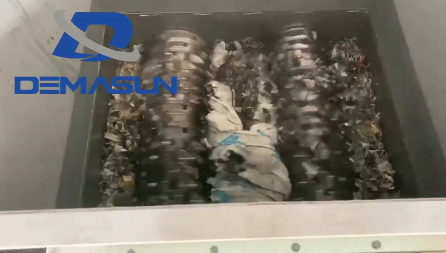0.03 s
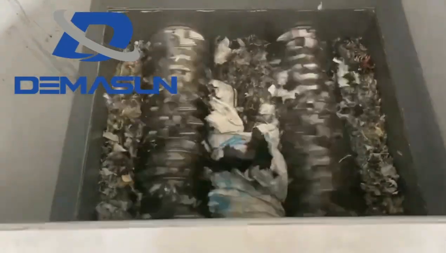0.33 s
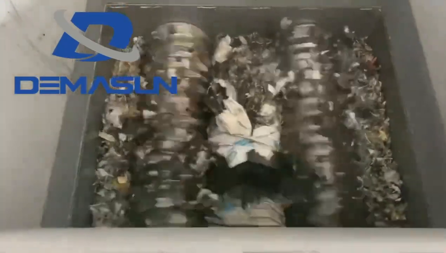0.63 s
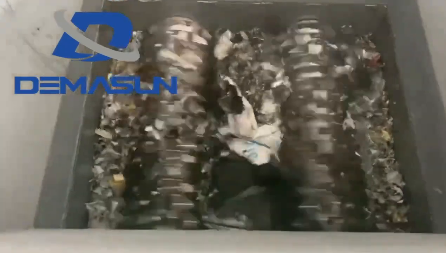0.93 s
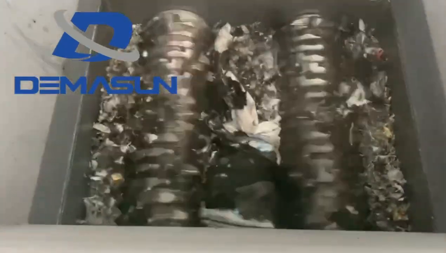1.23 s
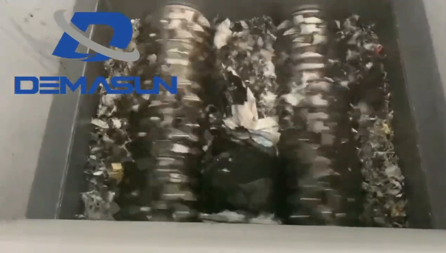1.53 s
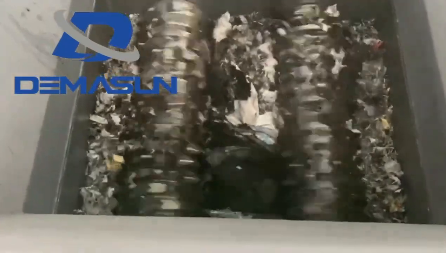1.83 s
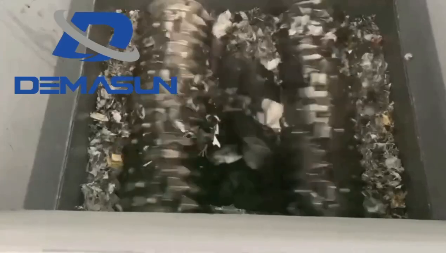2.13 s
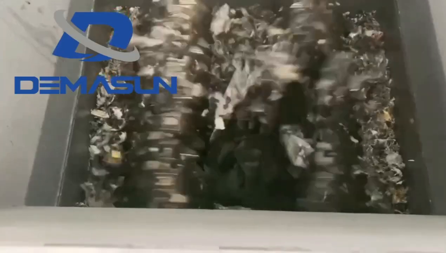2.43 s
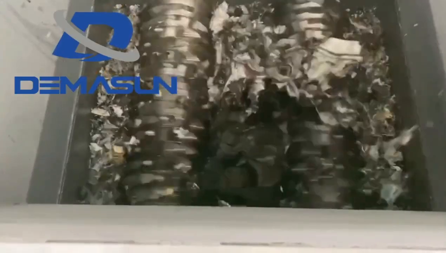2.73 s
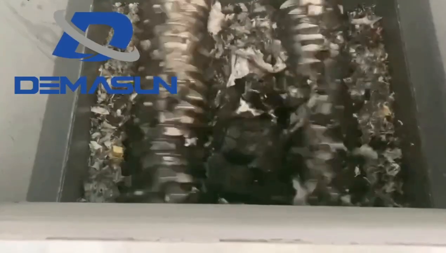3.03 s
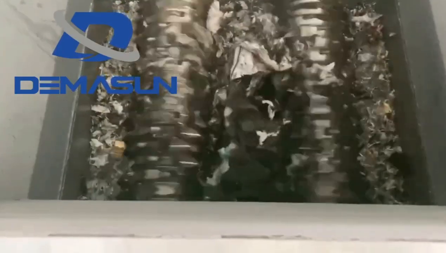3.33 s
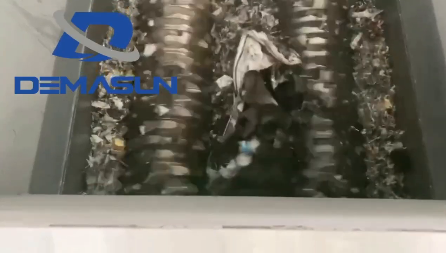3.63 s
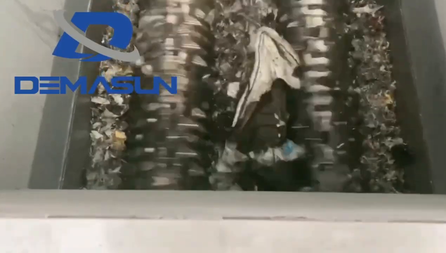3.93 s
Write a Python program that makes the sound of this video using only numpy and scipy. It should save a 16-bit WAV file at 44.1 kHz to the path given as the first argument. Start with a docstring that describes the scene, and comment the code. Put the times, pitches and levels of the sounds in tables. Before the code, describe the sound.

A shredder tears up plastic sheeting with rapid crunching, crackling bites and a low drone.

```python
"""A twin-shaft shredder tears up plastic sheeting, heard from just above its steel hopper.
The knives bite about five times a second. Each bite is a surge of tiny cracks that crunch, rip and
crackle, echoing between the hopper walls. Now and then a brittle piece snaps, or a lump knocks or
makes the housing groan. Underneath, scraps rustle, the frame rumbles, and motor and gears drone."""
import sys
import numpy as np
from scipy import signal
from scipy.fft import rfft, irfft
from scipy.io import wavfile

SR = 44100
rng = np.random.default_rng(int(sys.argv[2]) if len(sys.argv) > 2 else 0)


def store_pcm(level_fs):
    """Save levels as 16-bit WAV."""
    pcm = np.round(np.clip(level_fs, -1, 1) * 32767).astype(np.int16)
    wavfile.write(sys.argv[1], SR, np.atleast_2d(pcm).T)


N = 176400
T = np.arange(N) / SR

# Levels in the tables are relative: the functions may turn a layer up or down.
# hum of the motor (time [s], level [dB])
MOTOR_LEVELS = [(0, -31), (.46, -30), (.6, -37), (.7, -32.5), (1.35, -37), (1.65, -37), (1.78, -29.5),
                (2.05, -27), (2.6, -36), (3.5, -32), (3.65, -23.5), (3.8, -33.5), (4, -20.5)]
# drone of the gear teeth (time [s], level [dB])
GEAR_LEVELS = [(0, -39), (.4, -29.5), (1.5, -30), (1.9, -47), (2.4, -31.5), (2.8, -32), (4, -34)]
# rumble of the frame (time [s], level [dB])
RUMBLE_LEVELS = [(0, -24), (.5, -27), (.8, -26), (1.7, -26), (2.1, -26), (2.45, -25.5), (3.0, -25),
                 (4, -26)]
# notes at which frame and hopper ring (pitch [Hz], width [Hz], level [dB])
FRAME_RESONANCES = [(79.5, 9.8, -3), (103.2, 8.7, -9.5), (146, 12, -6.5), (170.6, 4.6, -1.5), (195, 12, 1),
                    (215, 10, -3.5), (252.4, 17.6, -6), (285.8, 16, -2.5), (348.5, 16.4, -1.5),
                    (384.6, 28, -7.5), (428.6, 10.8, -6.5), (473.8, 26, -9.5)]
# clatter of loose scraps (time [s], level [dB])
CLATTER_LEVELS = [(0, -35), (.75, -33), (1.1, -30), (1.9, -32), (2.65, -33.5), (3.0, -30), (3.3, -32),
                  (3.6, -30), (4, -33.5)]
# crinkle of thin film (time [s], level [dB])
CRINKLE_LEVELS = [(0, -39), (.3, -48.5), (.7, -43.5), (1.1, -40), (1.8, -37), (2.2, -40.5), (2.5, -46.5),
                  (3.1, -45.5), (4, -47.5)]
# groans of the housing (middle time [s], length [s], pitch [Hz], level [dB])
HOUSING_GROANS = [(0.263, 0.022, 340, -21), (0.525, 0.042, 229, -23), (0.57, 0.06, 340, -24),
                  (0.63, 0.083, 280, -27), (1.17, 0.035, 189.7, -25), (1.823, 0.047, 235, -21),
                  (2.04, 0.15, 176, -23.5), (2.2, 0.03, 186.3, -21.5), (2.259, 0.071, 278, -22.5),
                  (2.814, 0.045, 224.5, -24.5), (2.874, 0.059, 245, -26.5), (2.964, 0.056, 201.4, -20),
                  (3.087, 0.051, 215, -23.5), (3.429, 0.087, 248.5, -22.5), (3.588, 0.094, 207.6, -23.5)]
# lumps hitting the cutting chamber (time [s], level [dB], pitch [Hz])
LUMP_KNOCKS = [(0.918, -16, 836), (1.092, -19.5, 870), (1.423, -20, 746), (1.817, -15, 736),
               (1.836, -14, 830), (1.88, -14, 710), (2.068, -16, 775), (2.353, -21, 1240),
               (2.541, -17, 850), (2.864, -19, 790), (2.957, -15.5, 920), (3.053, -16.5, 690),
               (3.334, -20, 830), (3.503, -13, 925)]
# brittle pieces breaking (time [s], level [dB])
BRITTLE_SNAPS = [(0.218, -20.5), (0.918, -20.5), (1.208, -18.5), (1.226, -15), (1.302, -20), (1.422, -19),
                 (1.4706, -23), (1.774, -20.5), (1.834, -22), (1.8785, -17), (1.964, -18.5),
                 (1.9994, -13.5), (2.0618, -14), (2.074, -17), (2.1987, -21), (2.977, -17.5), (3.16, -32),
                 (3.437, -19.5), (3.636, -22)]
# bites of the knives (start [s], length [s], crunch [dB], rip [dB], crackle [dB])
KNIFE_BITES = [(0.018, 0.12, -29.5, -35, -44), (0.197, 0.18, -34.5, -36.5, -36),
               (0.38, 0.17, -32, -37.5, -39), (0.567, 0.15, -35.5, -36, -39),
               (0.783, 0.13, -29.5, -32.5, -35.5), (0.989, 0.13, -31, -33, -35.5),
               (1.166, 0.16, -35.5, -31.5, -34), (1.34, 0.19, -43, -33.5, -34.5),
               (1.552, 0.16, -28.5, -33, -31.5), (1.764, 0.15, -26.5, -31.5, -31.5),
               (1.975, 0.11, -27, -30.5, -34), (2.13, 0.17, -29.5, -35, -37),
               (2.326, 0.12, -43, -36.5, -41), (2.525, 0.12, -31.5, -36, -40.5),
               (2.734, 0.12, -27.5, -37.5, -40.5), (2.918, 0.16, -29, -34.5, -37.5),
               (3.147, 0.085, -30, -31, -36), (3.329, 0.13, -25, -32, -36), (3.526, 0.14, -32, -36.5, -36),
               (3.67, 0.14, -44, -58, -42.5), (3.871, 0.15, -27.5, -41, -41)]

# tone of dull thuds in the housing (frequency [Hz], level [dB])
THUD_TONE = [(10, -36), (38, -20.5), (70, -1), (130, 0), (220, -2.5), (400, -3.5), (600, -15.5),
             (1500, -34), (4000, -84)]
# tone of tumbling scraps (frequency [Hz], level [dB])
CLATTER_TONE = [(200, -13), (700, 2), (1000, 1), (1380, -3.5), (1650, -12), (1870, -8), (2200, -10),
                (2800, -13), (3700, -17.5), (4700, -16), (5800, -17.5), (7000, -23), (9700, -28),
                (11500, -42)]
# tone of a brittle snap (frequency [Hz], level [dB])
SNAP_TONE = [(150, -22), (700, 11), (1500, 4), (3600, -1), (5000, 4), (7200, -7.5), (12000, -16.5)]
# tone of thick parts crunching (frequency [Hz], level [dB])
CRUNCH_TONE = [(35, -37), (180, -7), (300, 3), (520, -1), (750, 2), (950, -2), (1200, -3), (1400, -8),
               (1650, -13.5), (3000, -26.5), (8000, -65)]
# tone of sheets ripping (frequency [Hz], level [dB])
RIP_TONE = [(500, -17), (1400, -30.5), (1700, -1), (1850, 10.5), (2150, 4.5), (2700, 7), (3300, -3),
            (4200, -17), (9000, -62)]
# tone of thin film crackling (frequency [Hz], level [dB])
CRACKLE_TONE = [(800, -25.5), (2800, 0.5), (3800, 1.5), (4600, 5), (5900, 3.5), (6900, -3.5), (7600, -1),
                (9700, -1.5), (11500, -10), (12500, -49)]


def amp(db):
    """Turns decibels into a factor to multiply by."""
    return 10 ** (np.asarray(db) / 20)


def unit(x):
    """Scales a signal to an average strength (rms) of 1."""
    return x / np.sqrt(np.mean(x ** 2) + 1e-20)


def level(points):
    """A volume curve through (time [s], level [dB]) points."""
    return amp(np.interp(T, *np.transpose(points)))


def add(mix, start_s, sound):
    """Adds a sound to the mix at the given time."""
    part = mix[max(round(start_s * SR), 0):][:len(sound)]
    part += sound[:len(part)]


def wander(rate_hz):
    """A smooth random wobble of strength 1, up to about the given rate."""
    f = np.fft.rfftfreq(N, 1 / SR)
    return unit(irfft(rfft(rng.standard_normal(N)) * (f > 0) / (1 + (f / rate_hz) ** 4), N))


def colour(x, tone, size=4096):
    """Filters a sound to follow a tone table, with no ringing ahead of a click."""
    hz, db = np.transpose(tone)
    f = abs(np.fft.fftfreq(size, 1 / SR))
    log_gain = np.log(amp(np.interp(np.log(f + 1), np.log(hz), db)))
    response = np.fft.ifft(np.exp(np.conj(signal.hilbert(log_gain)))).real
    return signal.oaconvolve(x, response)[:len(x)]


def ring(x, hz, width_hz):
    """One resonance: the narrower it is, the longer it rings."""
    return signal.lfilter(*signal.iirpeak(hz, hz / width_hz, fs=SR), x)


def clicks(per_s, spread_db):
    """Clicks at random times, most small and a few large."""
    size = amp(spread_db * np.minimum(rng.exponential(1, N), 3.38))
    return unit(size * rng.choice([-1., 1.], N) * (rng.random(N) < per_s / SR))


def hopper(x, echo_db, echo_s, dwell_s=0.011, places=14, size=4096):
    """Quick echoes between the steel walls, changing as the tearing jumps along the rotors."""
    t = np.arange(size) / SR
    echoes = rng.standard_normal((places, size)) * (rng.random((places, size)) < .2)
    echoes *= (t > .0005) * amp(-60 * t / echo_s)
    echoes /= np.linalg.norm(echoes, axis=1, keepdims=True)
    place = rng.integers(0, places, N)[(T / dwell_s).astype(int)]
    tearing_here = place == np.arange(places)[:, None]
    return x + amp(echo_db) * signal.oaconvolve(x * tearing_here, echoes, axes=1).sum(0)[:N]


def plastic(force, tone, per_s, spread_db, clump_db, clump_hz, echo_db, echo_s):
    """Plastic under force cracks in clumps; the hopper and the material shape the tone."""
    cracks = unit(clicks(per_s, spread_db) * amp(clump_db * wander(clump_hz))) * force
    shaped = colour(hopper(cracks, echo_db, echo_s), tone)
    return unit(shaped) * np.sqrt(np.mean(force ** 2))


def grip(start, length, roundness=0.45):
    """The load of one bite: a rounded arch from 0 up to 1 and back."""
    progress = np.clip((T - start) / length, 0, 1)
    return abs(np.sin(np.pi * progress)) ** roundness


def wavering_phase(hz, wobble_hz, rate_hz):
    """The angle of a sine wave whose pitch wobbles at random around hz."""
    return 2 * np.pi * np.cumsum(hz + wobble_hz * wander(rate_hz)) / SR


def motor():
    """The motor gives a low hum that wavers in pitch and loudness."""
    hum = np.sin(wavering_phase(hz=52.2, wobble_hz=2, rate_hz=16.6))
    return amp(1) * level(MOTOR_LEVELS) * hum * amp(3.9 * wander(5.2))


def gears():
    """Meshing gear teeth give a wavering note and a softer one an octave higher."""
    phase = wavering_phase(hz=281, wobble_hz=6.74, rate_hz=20.9)
    note, octave = (unit(np.sin(k * phase) * amp(3.5 * wander(9))) for k in (1, 2))
    return level(GEAR_LEVELS) * (note + amp(-12.5) * octave)


def frame(load_db=1):
    """A hail of small blows rings the frame and thuds in the housing, harder while the knives grip."""
    thuds = unit(colour(clicks(per_s=700, spread_db=3.5), THUD_TONE))
    ringing = np.zeros(N)
    for hz, width, db in FRAME_RESONANCES:
        blows = clicks(per_s=400, spread_db=1.9)
        ringing += amp(db) * unit(ring(ring(blows, hz, width), hz, 4 * width))
    rumble = amp(-1) * unit(ringing) + amp(-1.5) * thuds
    load = sum(grip(start, length) for start, length, *_ in KNIFE_BITES)
    return level(RUMBLE_LEVELS) * amp(load_db * (load - load.mean())) * rumble


def scraps():
    """Loose shreds clatter on the rotors and film crinkles all the time."""
    clatter = plastic(level(CLATTER_LEVELS), CLATTER_TONE, per_s=2400, spread_db=3,
                      clump_db=1.1, clump_hz=43.4, echo_db=-1.5, echo_s=0.072)
    # a negative spread gives mostly full-size clicks and a few weaker ones
    crinkle = plastic(level(CRINKLE_LEVELS), CRACKLE_TONE, per_s=2100, spread_db=-2,
                      clump_db=4, clump_hz=33.4, echo_db=8, echo_s=0.02)
    return clatter + crinkle


def groans():
    """A tough lump loads the shafts, and one note of the housing swells and fades."""
    out = np.zeros(N)
    for middle, length, hz, db in HOUSING_GROANS:
        swell = np.exp(-2 * ((T - middle) / length) ** 2)
        note = np.sqrt(2) * np.sin(wavering_phase(hz, wobble_hz=26, rate_hz=44.7))
        out += amp(db) * swell * note
    return out


def knocks(gain_db=2, thump_decay_s=0.0036, grit_decay_s=0.0071, size=2048):
    """Lumps hit the cutting chamber: a hollow thump with a faint gritty tail."""
    t = np.arange(size) / SR
    out = np.zeros(N)
    for start, db, hz in LUMP_KNOCKS:
        thump = np.sin(2 * np.pi * hz * t) * np.exp(-t / thump_decay_s)
        grit = unit(ring(rng.standard_normal(size), hz, width_hz=110)) * np.exp(-t / grit_decay_s)
        add(out, start, amp(db + gain_db) * (thump + amp(-15.5) * grit))
    return out


def snaps(gain_db=-1, rise_s=0.00081, decay_s=0.0059, size=2048):
    """Brittle pieces break, each with a short, bright burst of noise."""
    t = np.arange(size) / SR
    burst = np.minimum(t / rise_s, 1) * np.exp(-t / decay_s)
    out = np.zeros(N)
    for start, db in BRITTLE_SNAPS:
        add(out, start, amp(db + gain_db) * rng.standard_normal(size) * burst)
    return colour(hopper(out, echo_db=-29, echo_s=0.05), SNAP_TONE)


def bites():
    """Each bite loads the plastic and lets go: thick parts crunch, sheets rip, film crackles."""
    crunch_force, rip_force, crackle_force = sum(
        amp(levels_db)[:, None] * grip(start, length) for start, length, *levels_db in KNIFE_BITES)
    crunch = plastic(crunch_force, CRUNCH_TONE, per_s=1300, spread_db=2.5,
                     clump_db=2.5, clump_hz=58.6, echo_db=2, echo_s=0.034)
    rip = plastic(rip_force, RIP_TONE, per_s=900, spread_db=0.5,
                  clump_db=3, clump_hz=70, echo_db=7, echo_s=0.045)
    crackle = plastic(crackle_force, CRACKLE_TONE, per_s=1100, spread_db=1.5,
                      clump_db=0.5, clump_hz=130, echo_db=2, echo_s=0.0096)
    return crunch + amp(-3) * rip + amp(-0.58) * crackle


def scene():
    """The whole machine, added up in one channel."""
    background = motor() + gears() + frame() + scraps()
    shredding = groans() + knocks() + snaps() + bites()
    return (background + shredding)[None]


def record(dry, notch_hz=8360, notch_width_hz=408, notch_db=-27, ceiling_db=-8, top_hz=12400):
    """Cuts a narrow notch in the treble, softly rounds loud peaks and removes the highest treble."""
    f = np.fft.rfftfreq(N, 1 / SR)
    notch = amp(notch_db * np.exp(-((f - notch_hz) / notch_width_hz) ** 2))
    notched = irfft(rfft(dry) * notch, N)
    rounded = notched / (1 + (notched / amp(ceiling_db)) ** 4) ** (1 / 4)
    low_pass = signal.firwin(401, top_hz, window=("kaiser", 9), fs=SR)
    return signal.oaconvolve(rounded, low_pass[None], "same")


dry = scene()
out = record(dry)
store_pcm(out)
```